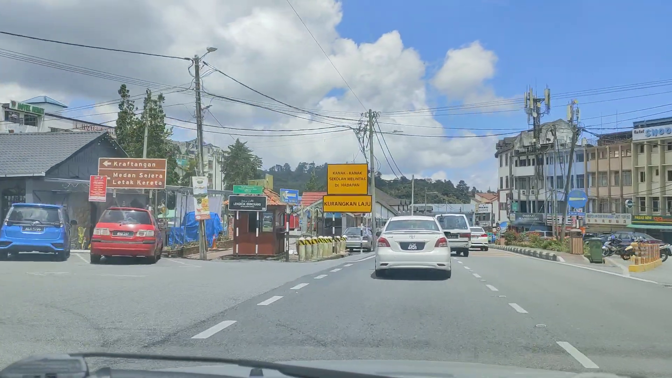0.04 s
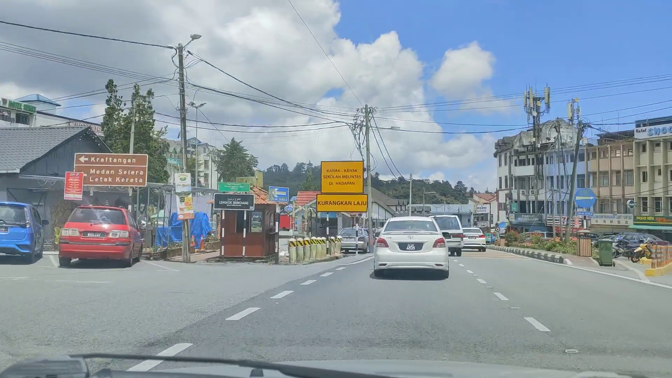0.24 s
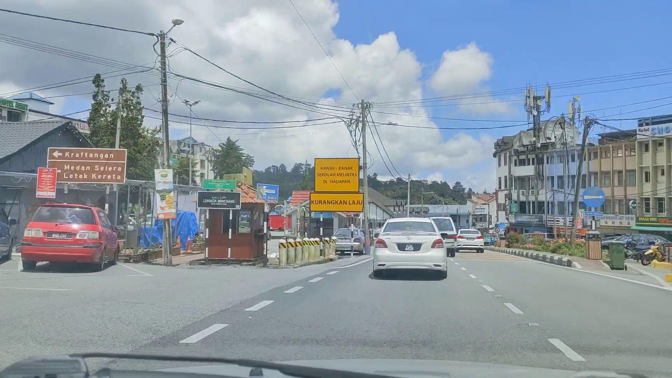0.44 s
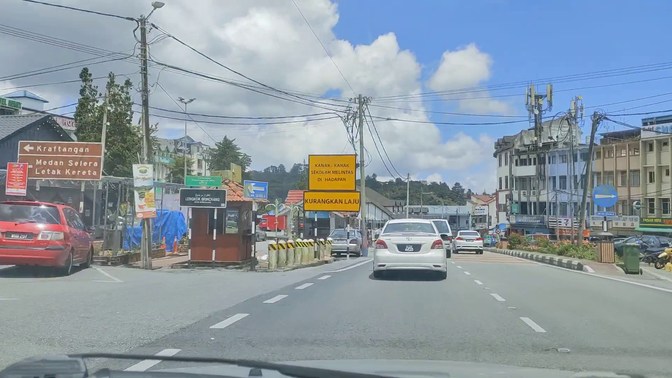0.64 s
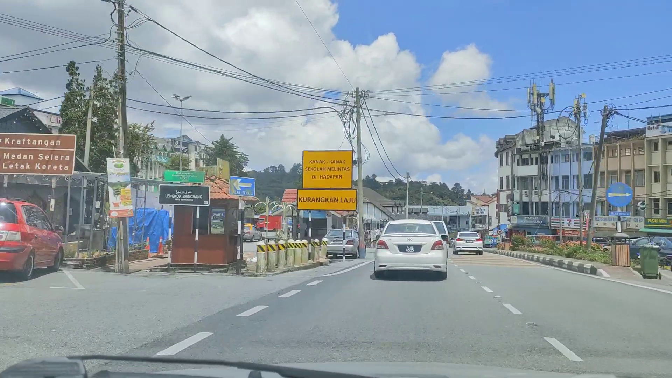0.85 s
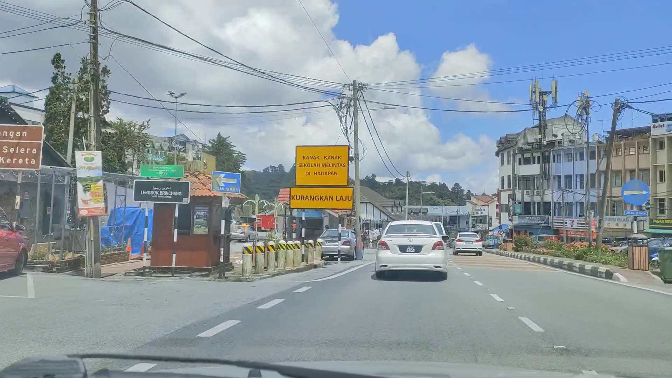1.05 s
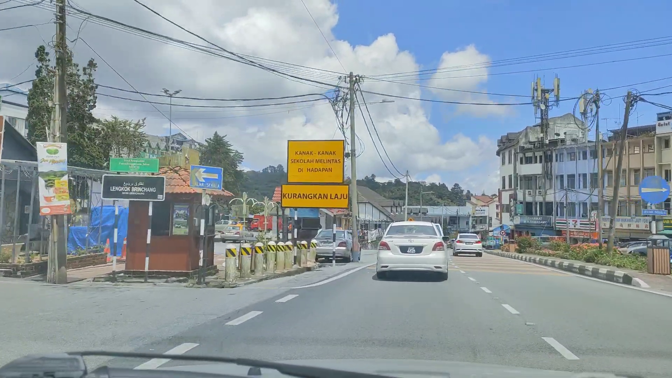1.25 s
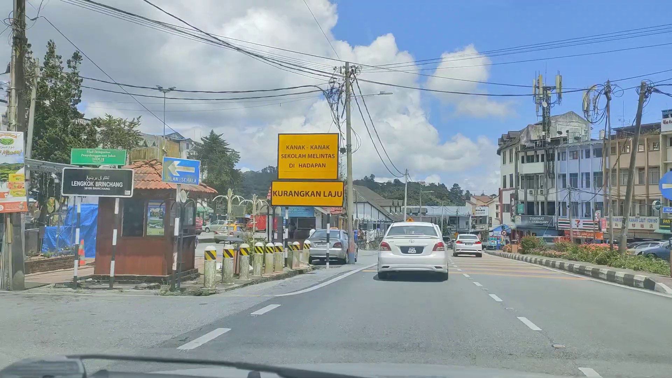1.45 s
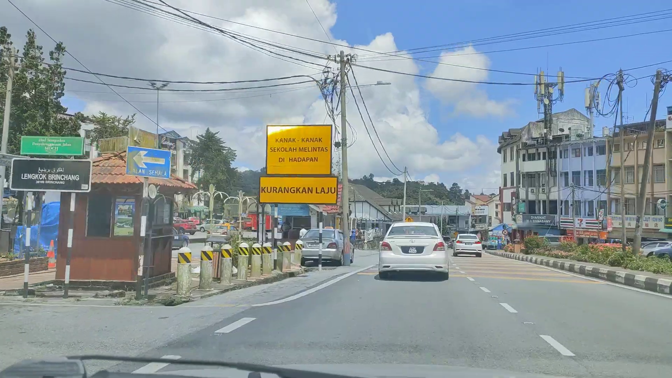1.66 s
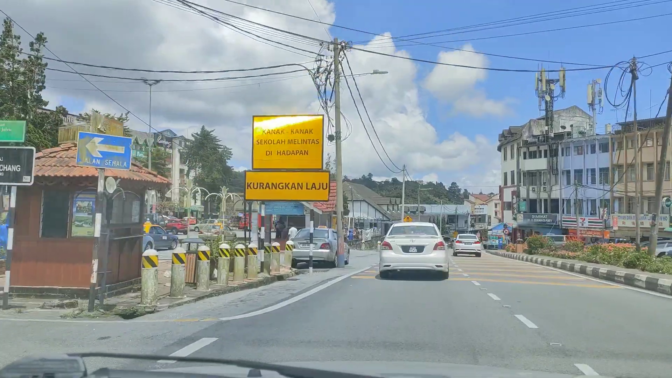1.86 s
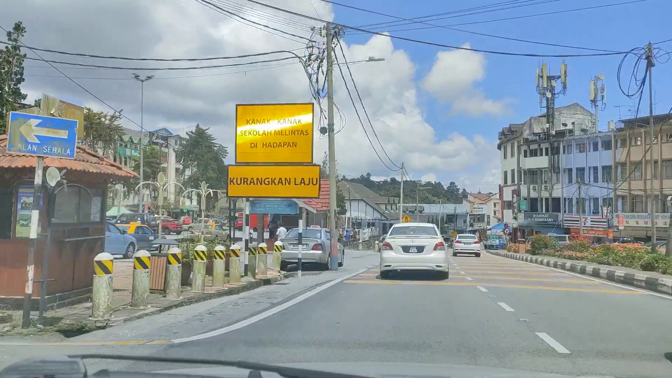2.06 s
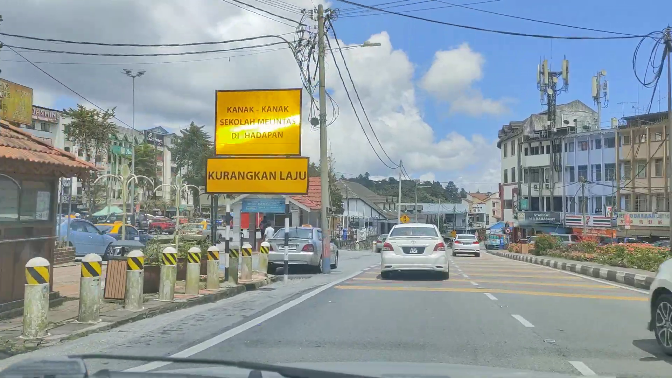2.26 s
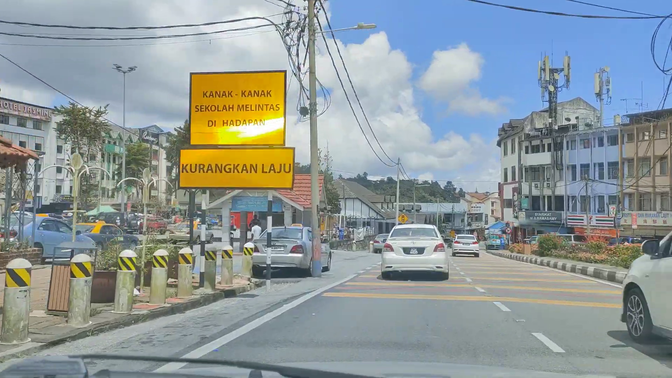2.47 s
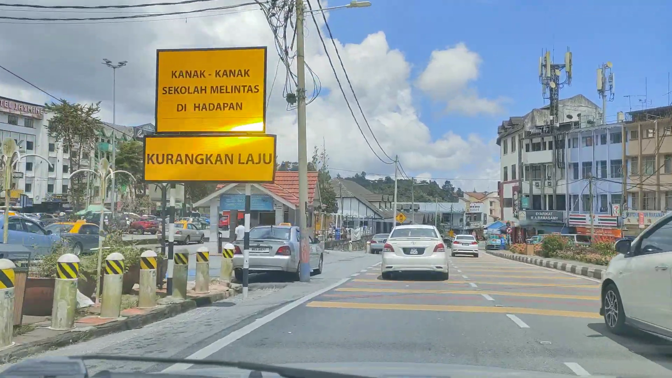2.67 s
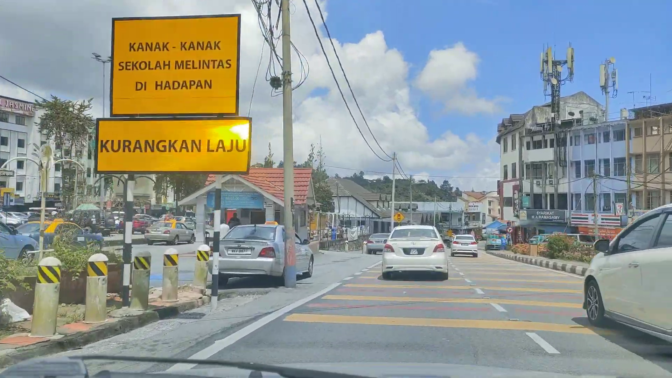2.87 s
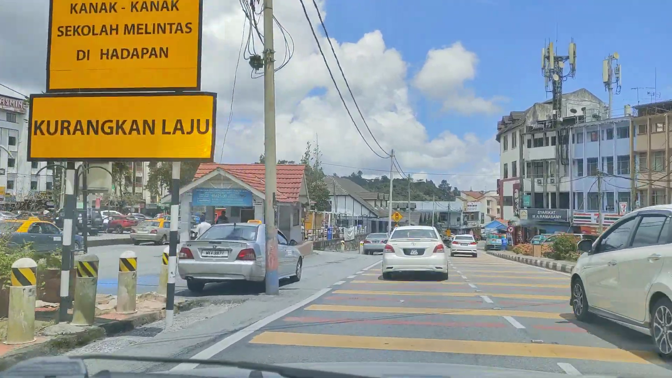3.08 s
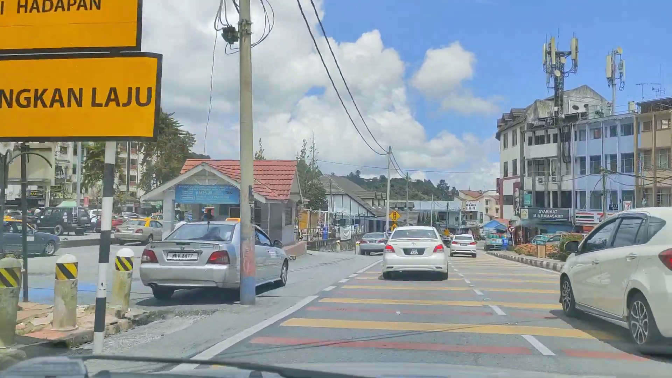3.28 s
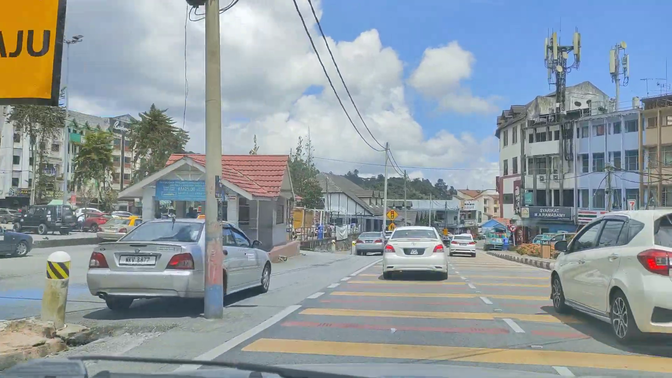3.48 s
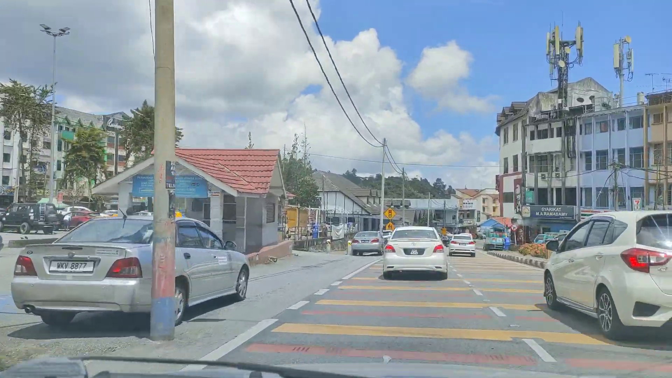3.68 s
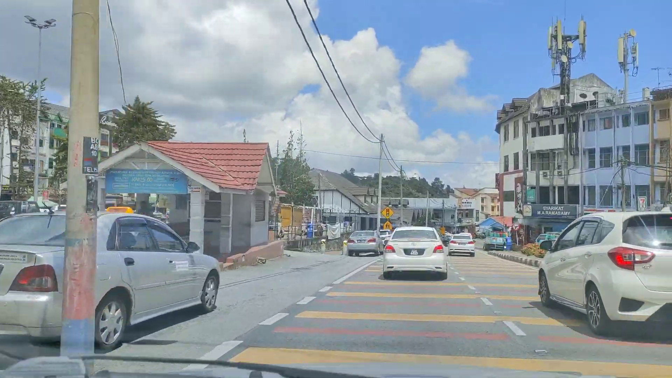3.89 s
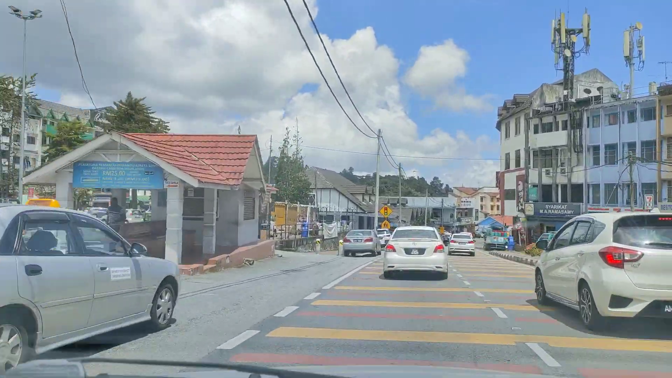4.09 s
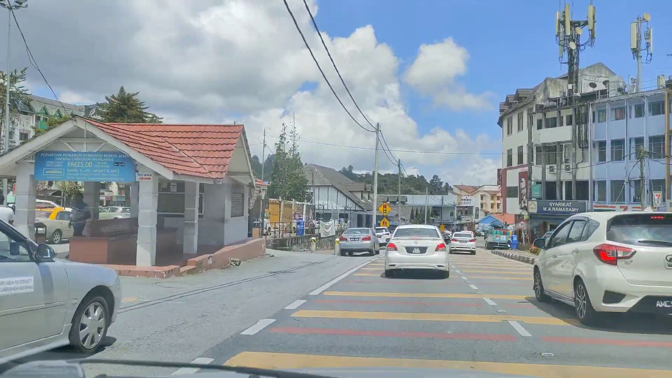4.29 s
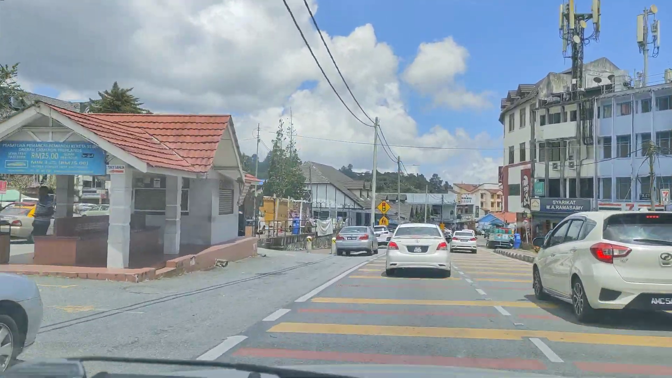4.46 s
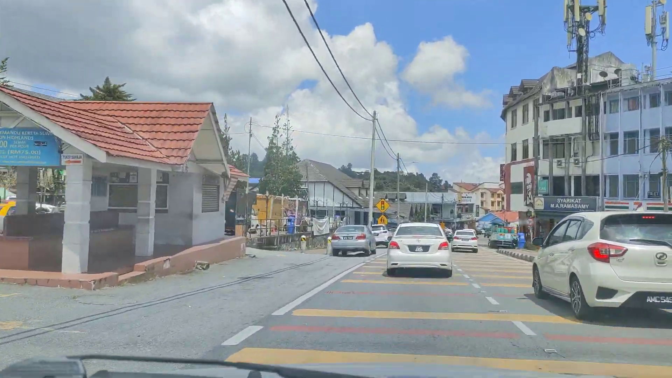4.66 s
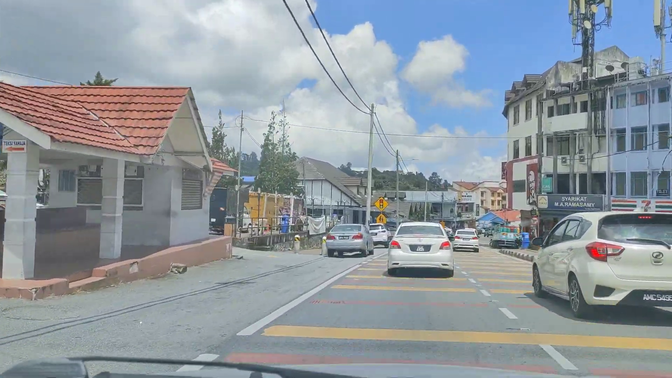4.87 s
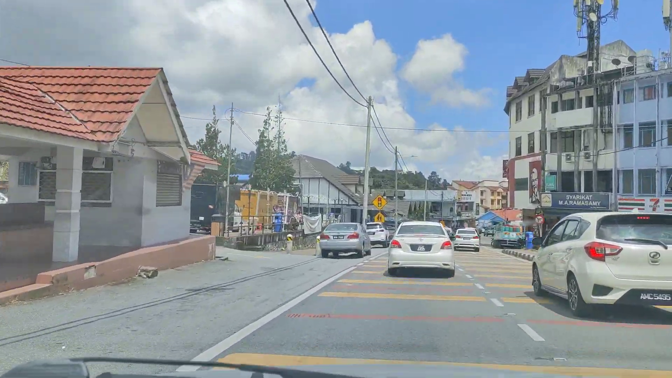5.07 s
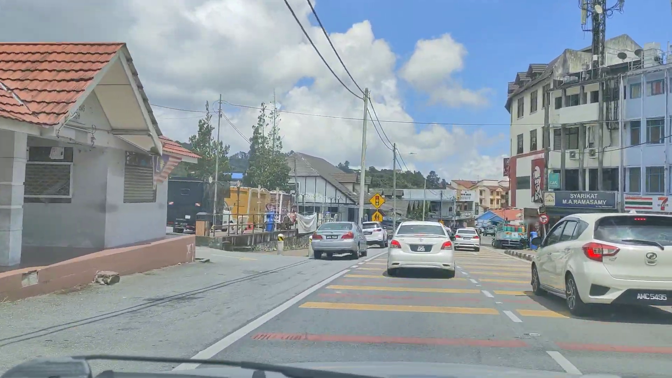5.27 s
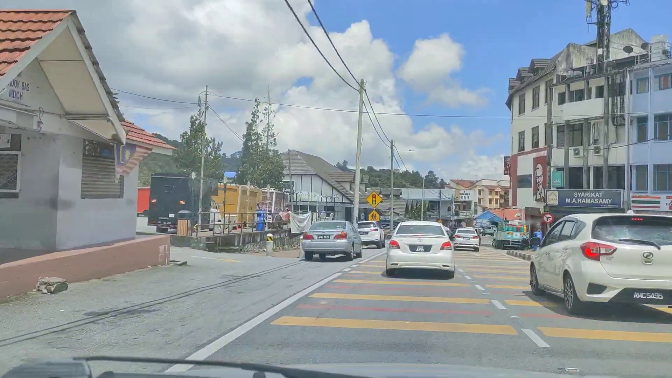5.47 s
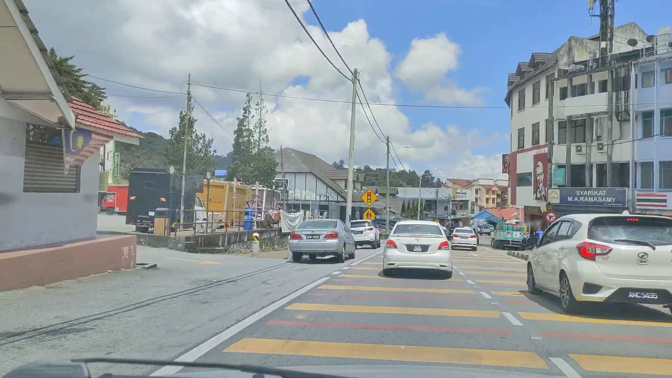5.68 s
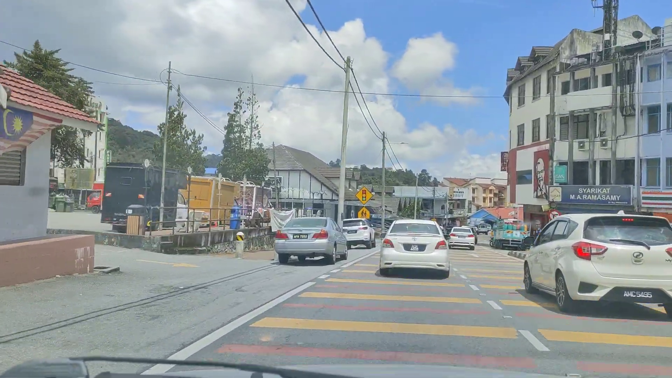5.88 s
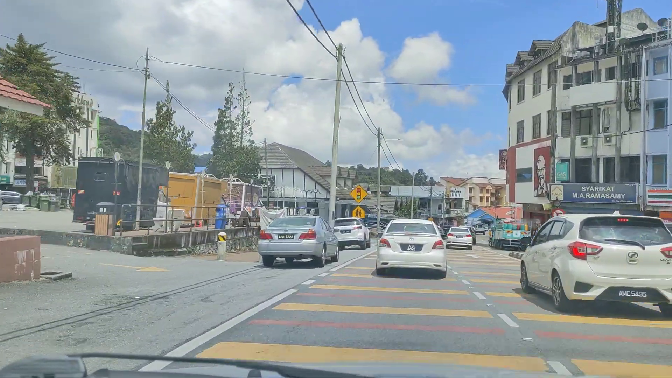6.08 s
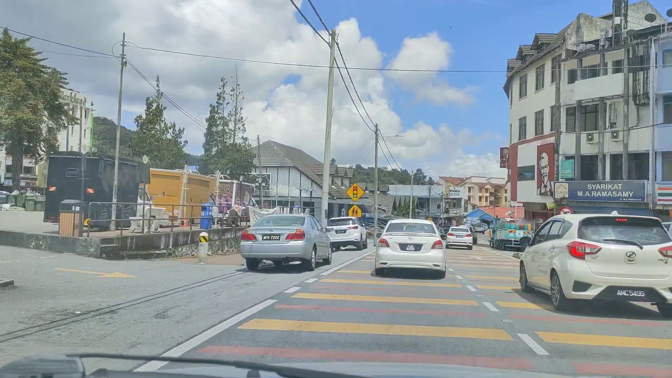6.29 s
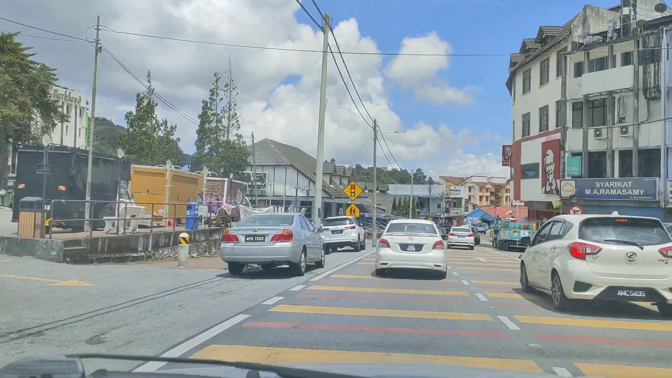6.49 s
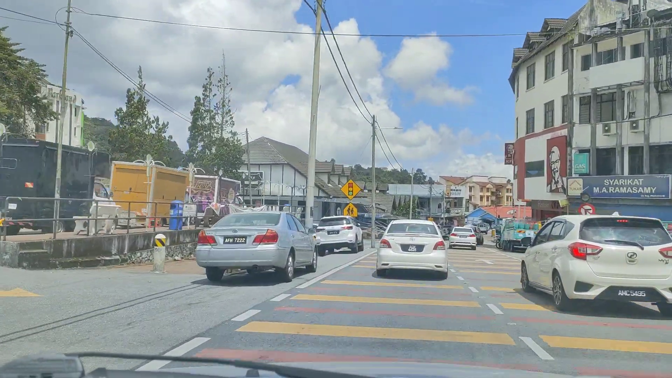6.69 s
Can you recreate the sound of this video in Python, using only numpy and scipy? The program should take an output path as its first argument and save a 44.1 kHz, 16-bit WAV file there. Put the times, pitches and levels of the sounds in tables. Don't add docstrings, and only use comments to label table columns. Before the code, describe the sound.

Muffled cabin road noise rolls along for four seconds before wheels bump irregularly across ridges, with body heaves, rattling dashboard and one brief brake squeal.

```python
import sys
import numpy as np
from scipy import signal
from scipy.fft import rfft, irfft, next_fast_len
from scipy.io import wavfile

SR = 44100
rng = np.random.default_rng(int(sys.argv[2]) if len(sys.argv) > 2 else 0)


def convert_level_to_amplitude(level_db):
    exponent = np.asarray(level_db, float) / 20
    return 10 ** exponent


def wav_out(sig):
    wavfile.write(sys.argv[1], SR, np.round(np.clip(np.atleast_2d(sig).T, -1, 1) * 32767).astype(np.int16))


N = 297234


def in_time(rows):
    s, *columns = np.transpose(rows)
    return [np.interp(np.arange(N) / SR, s, c) for c in columns]


def at_hz(points, hz):
    point_hz, level_db = np.array(points).T[:2]
    return np.interp(np.log(hz), np.log(point_hz), level_db)


def drift(rate_hz):
    r = np.exp(-80 * np.pi * rate_hz / SR)
    noise = rng.standard_normal(N // 40 + 2002)
    slow = signal.lfilter([1], [1, -2 * r, r * r], noise)[2000:]
    return np.interp(np.arange(N) / 40, np.arange(len(slow)), slow / slow.std())


# hz, level_db
OPPOSED = [(20, -34.5), (40, -26), (60, -14.5), (92, -17.5), (140, -18.5), (210, -7.5), (330, -8.0),
           (500, -0.5), (760, 5), (1170, 8.5), (1780, 2.5), (2730, 2.5), (4170, 0.0), (6370, 0.0)]
# centre_hz, width_hz, sum_db, difference_db
CABIN = [(109, 16, -0.5, 1), (185, 13, 0.5, 1), (545, 110, 2.5, -1), (865, 240, 1.5, 1),
         (1215, 160, 4.5, 3), (2230, 400, 2, -8), (3820, 750, 4, 4)]


def cabin_noise(colour, low_hz, high_hz, patchy_db, rate_hz):
    lag_s, one_sided = .00045, .5
    size = next_fast_len(N)
    hz = np.arange(size // 2 + 1) * SR / size + .01
    level_db = np.tile(at_hz(colour, hz), (2, 1))
    level_db[1] += at_hz(OPPOSED, hz)
    for centre_hz, width_hz, *gain_db in CABIN:
        level_db += np.array(gain_db)[:, None] / (1 + (2 * (hz - centre_hz) / width_hz) ** 2)
    white = rfft(rng.standard_normal((2, size)))
    turn = one_sided * np.tanh(3 * np.sin(2 * np.pi * hz * lag_s))
    white[1] = np.sqrt(1 - turn ** 2) * white[1] - 1j * turn * white[0]
    spectrum = convert_level_to_amplitude(level_db) * white
    edges_hz, out = np.geomspace(low_hz, high_hz, 4), 0
    for a, b in zip(edges_hz, edges_hz[1:]):
        window = np.sqrt(1 / (1 + (a / hz) ** 12) - 1 / (1 + (b / hz) ** 12))
        out = out + irfft(spectrum * window, size)[:, :N] * convert_level_to_amplitude(patchy_db * drift(rate_hz))
    return out / out[0].std()


# start_s, length_s, roar_db, heave_db, trim_db
CROSSINGS = [(3.91, 0.021, -38.5, -52, -87), (4.121, 0.062, -31, -34.5, -65.5),
             (4.31, 0.031, -44, -55, -90), (4.47, 0.093, -24, -38, -60), (4.61, 0.076, -29, -37, -59),
             (4.812, 0.061, -22, -30, -56.5), (4.93, 0.11, -27, -27.5, -62),
             (5.18, 0.078, -24.5, -32, -57.5), (5.28, 0.082, -29.5, -29, -68), (5.57, 0.1, -27, -34, -61.5),
             (5.72, 0.12, -34, -36.5, -79), (5.932, 0.14, -31.5, -40, -72), (6.12, 0.064, -32, -38, -62.5),
             (6.481, 0.12, -29, -36, -60.5), (6.621, 0.19, -32.5, -36, -63.5)]


def crossings(level_db, climb_s, held, settle_s):
    t, power = np.arange(0, N + 40, 40) / SR, 1e-20
    for (start_s, length_s, *_), db in zip(CROSSINGS, level_db):
        before_s = np.maximum(start_s - t, 0)
        after_s = np.maximum(t - start_s - held * length_s, 0)
        power = power + convert_level_to_amplitude(db) ** 2 * np.exp(-2 * (before_s / climb_s + after_s / settle_s))
    return np.interp(np.arange(N) / SR, t, np.sqrt(power))


def on_ridge():
    start_s, peak_db = np.transpose(THUDS)[:2]
    marks = np.zeros(N)
    marks[[round(s * SR) for s in start_s]] = np.clip((peak_db + 28) / 12, 0, 1)
    return np.clip(signal.fftconvolve(marks, np.hanning(1100), "same"), 0, 1)


# hz, density_db_per_hz
AIR_COLOUR = [(530, -28), (900, 5), (1250, -6.5), (1370, -3), (1480, -5.5), (1800, -6.5), (1900, -9.5),
              (2440, -11.5), (3230, -18), (3860, -20.5), (5890, -22), (6800, -32), (8840, -57.5),
              (15000, -120)]
# hz, density_db_per_hz
TOP_COLOUR = [(5000, 6), (6400, -3.5), (7000, -9), (8000, -15.5), (10000, -19), (12000, -23.5),
              (13600, -23.5), (16000, -36)]


def air_bands():
    bands = [(AIR_COLOUR, 1000, 2000), (AIR_COLOUR, 2000, 6500), (TOP_COLOUR, 6500, 14000)]
    return [cabin_noise(*band, patchy_db=1.75, rate_hz=5.0) for band in bands]


# time_s, level_db
TRAFFIC = [(0, -51.5), (.17, -49), (.53, -54), (1.04, -56), (1.3, -58), (1.6, -61), (2.08, -60.5),
           (2.32, -63.5), (2.75, -65), (3.0, -63.5), (3.56, -62.5), (5.0, -59.5), (6.74, -62)]
# hz, density_db_per_hz
WHINE_COLOUR = [(1900, -25), (2250, -2), (2600, 0), (2900, -2), (3200, -25)]


def street(bands):
    pass_s, pass_length_s, pass_db = 1.03, 0.5, -52
    whine_db, whine_ends_s, whine_fade_s, drone_re_whine_db = -57.5, 1.25, .1, 6.5
    trim_low_db, trim_top_db = -5.5, -14
    t = np.arange(N) / SR
    near_db = in_time(TRAFFIC)[0] + 60
    low = convert_level_to_amplitude(-58 + 0.51 * near_db)
    middle = convert_level_to_amplitude(-60.5 + 0.9 * near_db)
    top = convert_level_to_amplitude(-78 + 1.45 * near_db)
    low = np.hypot(low, convert_level_to_amplitude(pass_db) * np.exp(-((t - pass_s) / pass_length_s) ** 2))
    whine = convert_level_to_amplitude(whine_db) / (1 + np.exp((t - whine_ends_s) / whine_fade_s))
    trim = crossings(np.array(CROSSINGS)[:, 4], climb_s=0.014, held=0.87, settle_s=0.096)
    low = np.hypot(low, convert_level_to_amplitude(trim_low_db) * trim)
    middle = np.hypot(middle, trim)
    top = np.hypot(top, convert_level_to_amplitude(trim_top_db) * trim)
    out = sum(level * band for level, band in zip([low, middle, top], bands))
    out = out + whine * cabin_noise(WHINE_COLOUR, 2000, 3300, patchy_db=1.5, rate_hz=6.5)
    drone = cabin_noise(TYRE_COLOUR, 670, 1000, patchy_db=0.5, rate_hz=6.5)
    return out + convert_level_to_amplitude(drone_re_whine_db) * whine * drone


# time_s, pitch_hz, level_db
ENGINE = [(0, 46.4, -41), (1.2, 47.8, -73), (1.5, 46.5, -47.5), (2.3, 45.84, -54), (2.9, 42.3, -60),
          (3.55, 35.1, -56.5), (6.74, 33, -64)]


def engine():
    pitch_hz, level_db = in_time(ENGINE)
    line = np.sin(2 * np.pi * np.cumsum(pitch_hz * (1 + 0.031 * drift(2.4))) / SR)
    return convert_level_to_amplitude(level_db + 0.8 * drift(11)) * line * [[1], [.12]]


# hz, density_db_per_hz
TYRE_COLOUR = [(11, -37.5), (18, -8.5), (43, 2), (97, -5), (149, -1), (174, -1.5), (200, 0), (230, -5),
               (347, -7.5), (420, -12), (534, -14.5), (613, -21.5), (1100, -28.5), (1430, -45.5),
               (2420, -120)]
# time_s, level_db
ROAD = [(0, -36), (.57, -37.5), (1.09, -36), (1.5, -38.5), (2.27, -41), (2.65, -42), (2.94, -40),
        (3.5, -41), (4.0, -41.5), (5.0, -34), (6.0, -39), (6.74, -37.5)]


def tyres():
    heave_db, heave_follows, upper_db, upper_follows = -61.5, 3, -51, 0.7
    ridge_upper_db = -14.5
    road_db, = in_time(ROAD)
    swing_db = road_db + 40
    _, _, cross_roar_db, cross_heave_db, _ = np.transpose(CROSSINGS)
    grain = convert_level_to_amplitude(0.53 * drift(35))
    cross_heave = crossings(cross_heave_db, climb_s=0.046, held=0.43, settle_s=0.078)
    cross_roar = crossings(cross_roar_db, climb_s=0.019, held=1, settle_s=0.047)
    cross_upper = crossings(cross_roar_db + ridge_upper_db, climb_s=0.019, held=0.33, settle_s=0.078)
    heave = np.hypot(convert_level_to_amplitude(heave_db + heave_follows * swing_db), cross_heave)
    roar = np.hypot(convert_level_to_amplitude(road_db), cross_roar)
    upper = np.hypot(convert_level_to_amplitude(upper_db + upper_follows * swing_db), cross_upper)
    heave = heave * cabin_noise(TYRE_COLOUR, 15, 87, patchy_db=1.2, rate_hz=4)
    roar = roar * cabin_noise(TYRE_COLOUR, 87, 420, patchy_db=1.2, rate_hz=12)
    upper = upper * cabin_noise(TYRE_COLOUR, 420, 1000, patchy_db=1.2, rate_hz=12)
    dip = 1 - .82 * on_ridge()
    return heave + grain * (dip * roar + upper)


# time_s, pitch_hz, level_db, length_s
CHIRPS = [
    (1.927, 4350, -69.5, .015),
    (3.43, 5120, -71, .045),
    (4.588, 3400, -60, .008),
    (4.95, 7000, -69, .012),
    (5.029, 7030, -72, .015),
    (5.608, 3900, -66, .012),
    (6.06, 4200, -70, .012),
    (6.09, 3650, -66, .012),
]


def chirps():
    out, wobble, waver = np.zeros((2, N)), convert_level_to_amplitude(1.5 * drift(60)), drift(80)
    for s, pitch_hz, level_db, length_s in CHIRPS:
        near = slice(round((s - .15) * SR), round((s + .15) * SR))
        t = np.arange(near.start, near.stop) / SR - s
        tone = wobble[near] * np.sin(2 * np.pi * np.cumsum(pitch_hz + 30 * waver[near]) / SR)
        out[:, near] += convert_level_to_amplitude(level_db) * np.exp(-(t / length_s) ** 4) * tone * [[1], [.6]]
    return out


# start_s, peak_db
SNAPS = [
    (4.233, -50),
    (4.633, -54.5),
    (6.1815, -41),
    (6.53, -55),
]


def snaps():
    decay_s, band_hz = 0.0025, [3200, 7500]
    t = np.arange(N) / SR
    shape = sum(convert_level_to_amplitude(db) * (t > s) * np.exp(-np.abs(t - s) / decay_s) for s, db in SNAPS)
    band = signal.butter(2, band_hz, "band", fs=SR, output="sos")
    return signal.sosfilt(band, shape * rng.standard_normal((2, N)) + 1e-18)


# start_s, peak_db, low_db, top_db (low and top against the peak)
RATTLES = [(4.1216, -27.5, -7, -30), (4.1435, -42, -9, -18.5), (4.2322, -34.5, -28, -22.5),
           (4.4398, -40, -1, -42), (4.493, -42.5, 9.5, -26), (4.519, -41, 4, -30.5),
           (4.575, -47.5, 11, -32), (4.629, -39.5, -3, -17.5), (4.849, -41.5, 8, -31),
           (4.8678, -41, 1, -23.5), (4.9188, -48, 12, -26.5), (4.944, -39.5, -4, -27),
           (4.997, -54.5, 21.5, -23), (5.012, -43, 0, -31.5), (5.1918, -54, 19, -29),
           (5.2258, -40, -1, -24.5), (5.25, -50, 4, -21.5), (5.5724, -44, 2, -25), (5.6438, -56, 12, -15),
           (6.0215, -48, -1, -26), (6.178, -47.5, -6, -21), (6.5107, -45, 5.5, -27),
           (6.6509, -44, 1.5, -26.5)]


def rattles(bands):
    t60_s, top_decay_s = 0.13, 0.063
    t, shape = np.arange(N) / SR, np.zeros((3, N))
    for s, peak_db, low_db, top_db in RATTLES:
        span = slice(round(s * SR), round((s + .4) * SR))
        age_s = t[span] - s
        burst = (1 - np.exp(-np.abs(age_s) / 0.0017)) * convert_level_to_amplitude(peak_db - 9.0 - 50 * age_s / t60_s)
        burst *= 0.6 + 0.63 * np.exp(-np.abs(age_s) / .005)
        band_gain = convert_level_to_amplitude(np.array([[low_db], [0], [top_db + 12.0]]))
        top_fade = np.exp(-np.abs(age_s) / top_decay_s * np.array([[0], [0], [1]]))
        shape[:, span] += burst * band_gain * top_fade
    ticks = convert_level_to_amplitude(2.1 * drift(150))
    return sum(ticks * e * band[:, ::-1] for e, band in zip(shape, bands))


# pitch_hz, level_db, t60_s
DASH = [(560, 0.5, 0.026), (720, -6.5, .04), (855, -5.5, .05), (1146, 13, 0.017), (1420, -10, .03)]


def knocks():
    start_s, peak_db, low_db, _ = np.transpose(RATTLES)
    at = [round(s * SR) for s in start_s]
    blow_db = peak_db + low_db - 13.5
    out = np.zeros((2, N))
    chance = rng.standard_normal((len(at), 2 * len(DASH)))
    for k, (pitch_hz, level_db, t60_s) in enumerate(DASH):
        clicks = np.full((2, N), 1e-18)
        clicks[:, at] = convert_level_to_amplitude(blow_db + level_db) * chance[:, 2 * k:2 * k + 2].T
        r, w = convert_level_to_amplitude(-60 / (t60_s * SR)), 2 * np.pi * pitch_hz / SR
        out += signal.lfilter([0, np.sin(w)], [1, -2 * r * np.cos(w), r * r], clicks)
    return signal.lfilter([.12], [1, -.88], out)


# time_s, pitch_hz, level_db
SQUEAL = [
    (4.57, 5430, -89.5),
    (4.594, 5830, -47),
    (4.606, 5880, -59.5),
    (4.672, 6020, -54),
    (4.72, 5980, -69),
    (4.815, 6090, -56.5),
    (4.83, 6260, -93),
]


def squeal():
    first_s, first_hz, _ = SQUEAL[0]
    last_s, last_hz, _ = SQUEAL[-1]
    rows = [(first_s - .005, first_hz, -120)] + SQUEAL + [(last_s + .01, last_hz, -120)]
    pitch_hz, level_db = in_time(rows)
    phase = 2 * np.pi * np.cumsum(pitch_hz + 10.5 * drift(40)) / SR
    octave = convert_level_to_amplitude(-26) * np.clip((pitch_hz - 5980) / 100, 0, 1) * np.sin(2 * phase)
    tone = convert_level_to_amplitude(level_db + 2 + 3.5 * drift(25)) * (np.sin(phase) + octave)
    late = convert_level_to_amplitude(level_db + 3.5 + 2.5 * drift(35)) * np.sin(phase + 2.3)
    return np.array([tone, late])


# start_s, peak_db, pitch_hz (floor pan), length_s
THUDS = [(3.93, -16.5, 157, 0.0037), (4.13, -12, 184, 0.0054), (4.167, -12, 199, .0037),
         (4.314, -19.5, 172, 0.0041), (4.349, -18, 151, 0.0049), (4.475, -13, 170, 0.005),
         (4.512, -17, 243, 0.0024), (4.555, -18, 168, 0.025), (4.658, -12.5, 134, 0.011),
         (4.705, -12.5, 159, 0.0049), (4.789, -18, 146, 0.014), (4.832, -13, 173, 0.014),
         (4.87, -20.5, 189, .005), (4.89, -19.5, 143, .0029), (4.932, -12.5, 174, 0.002),
         (5.006, -8, 163, 0.0031), (5.202, -10.5, 188, .0023), (5.224, -18, 183, .0067),
         (5.271, -22, 115, 0.0038), (5.287, -13, 147, 0.0046), (5.454, -18.5, 146, 0.0094),
         (5.538, -14.5, 132, 0.0033), (5.586, -8.5, 189, 0.0067), (5.793, -22, 147.6, 0.059),
         (5.839, -19, 148, .0042), (6.031, -14, 107, .0024), (6.101, -17, 144, 0.0081),
         (6.132, -12, 169, 0.0061), (6.173, -15.5, 198, 0.0052), (6.641, -8.5, 187, 0.0091)]
# start_s, peak_db, pitch_hz, length_s
DROPS = [(4.139, -23, 56, 0.024), (4.235, -32, 45, .02), (4.826, -22, 55, 0.013), (4.87, -10, 54.8, 0.012),
         (4.943, -18.5, 50, .015), (5.16, -16.5, 45, 0.014), (5.378, -25, 45, 0.014),
         (5.55, -21, 50.3, .015), (5.92, -25, 50, 0.017), (6.541, -25.5, 45, 0.018), (6.65, -21, 50, .015)]


def thuds():
    out = np.zeros((2, N + SR))
    t = np.arange(-.03, .12, 1 / SR)
    events = THUDS + DROPS
    chance = rng.standard_normal((len(events), 3))
    for (s, peak_db, pitch_hz, length_s), (turn, share, lag) in zip(events, chance):
        swell = np.exp(-(t / (0.43 * length_s + 0.00072)) ** 2)
        ring = np.exp(-t / (0.63 * length_s + 0.0034))
        shape = np.where(t < 0, swell, ring)
        phase = 2 * np.pi * pitch_hz * t * (1 - 1.3 * t) + 3 * turn
        at = round((s - .03) * SR)
        out[0, at:at + len(t)] += convert_level_to_amplitude(peak_db - 2.5) * shape * np.cos(phase)
        out[1, at:at + len(t)] += convert_level_to_amplitude(peak_db - 23.0) * share * shape * np.cos(1.3 * phase + lag)
    return out[:, :N]


def scene():
    left_db = -0.92
    bands = air_bands()
    mix = tyres() + street(bands) + rattles(bands) + knocks() + thuds()
    mix = mix + engine() + squeal() + chirps() + snaps()
    total, difference = mix
    return np.array([convert_level_to_amplitude(left_db) * (total + difference), convert_level_to_amplitude(-left_db) * (total - difference)])


def band_limit(x):
    return signal.sosfilt(signal.butter(12, 13620, fs=SR, output="sos"), x)


def record(dry):
    return band_limit(dry)


dry = scene()
out = record(dry)
wav_out(out)
```